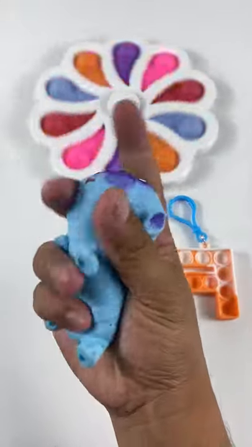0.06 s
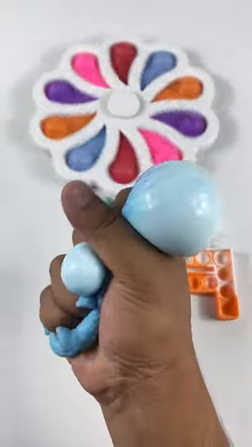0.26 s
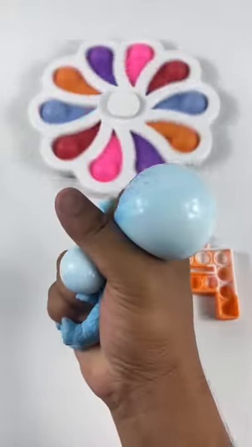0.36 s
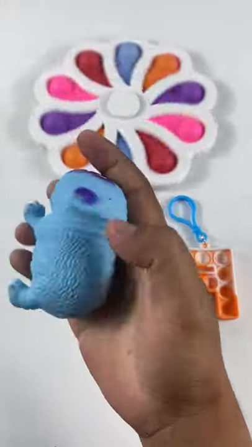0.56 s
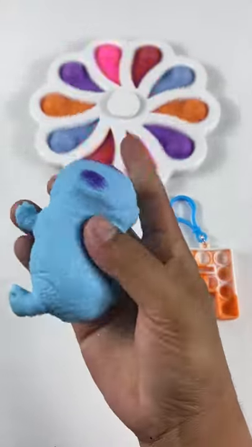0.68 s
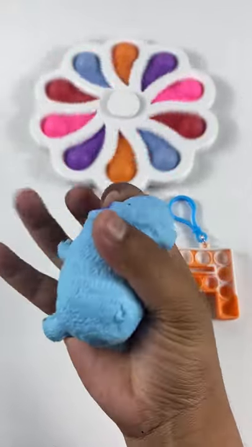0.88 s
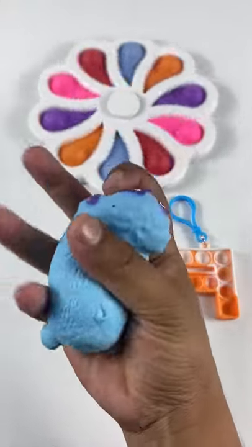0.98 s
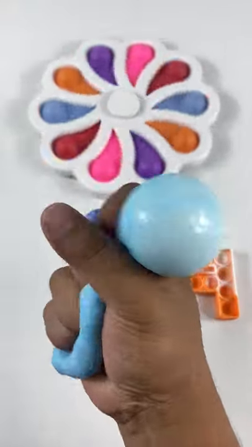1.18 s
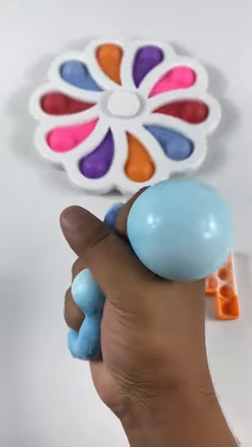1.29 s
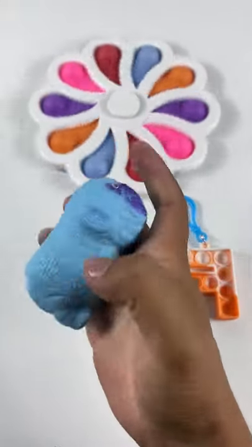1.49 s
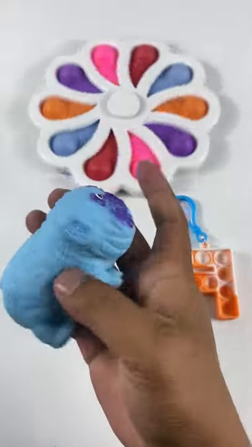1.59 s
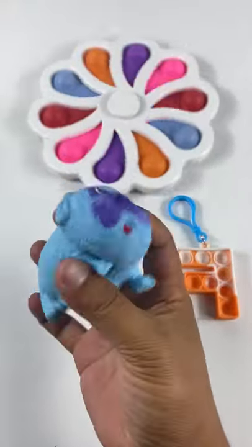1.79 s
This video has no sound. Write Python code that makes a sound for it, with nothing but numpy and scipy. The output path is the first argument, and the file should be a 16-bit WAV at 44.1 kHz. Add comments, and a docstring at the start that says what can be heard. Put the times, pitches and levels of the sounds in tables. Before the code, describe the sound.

A squeezed rubber toy, close up in a small room. Faint sliding and sticky ticks lead to a very loud, hollow, slightly clipped pop at 0.24 s, a skin snap at 0.26, and a short room tail. Soft rubbing and squelches around 0.5. A tiny gurgle at 1.2, then quick bright snaps at 1.26-1.27. A small crisp smack at 1.46 and moist squelching follow, fading into faint noise and hum.

```python
"""Squeezed rubber toy

A hand squeezes a hollow rubber toy twice, heard close up in a small room. In the first squeeze a
balloon-like bulge pops out: a push of air, a ringing cavity and a crack; in both, stretched skin snaps.
Sliding air and rubber hiss, rubbing rubber squelches, air pockets gurgle and sticky rubber clicks;
late in the second squeeze the bulge snaps back. An echo, a diffuse tail, room noise and hum surround it.
"""
import sys
import numpy as np
from scipy import signal
from scipy.fft import rfft, irfft
from scipy.io import wavfile
from scipy.ndimage import uniform_filter1d

SR = 44100
rng = np.random.default_rng(int(sys.argv[2]) if len(sys.argv) > 2 else 0)


def dump(signal):
    """Clip the signal to [-1, 1] and save it as 16-bit WAV at the path in sys.argv[1]."""
    limited = np.clip(np.atleast_2d(signal).T, -1, 1)
    pcm = np.round(limited * 32767).astype(np.int16)
    wavfile.write(sys.argv[1], SR, pcm)


N = 81585  # samples

# The bulge popping out. The row: start in seconds, settled pitch in Hz, level of the ring in dB,
# rise in seconds, decay in seconds, level of the air push in dB.
BULGE_POP = (0.2420, 788, 1, .0006, .0045, -5.5)
POP_START_HZ, POP_GLIDE_S = 600, .0018
PUSH_RISE_S, PUSH_FALL_S = .0006, .0002
POP_CRACK_DB, POP_CRACK_S = -11, .001
# Brief other modes of the cavity. Each row: pitch in Hz, level in dB relative to the main ring, decay in seconds.
CAVITY_MODES = [(330, -22, .003), (485, -17, .004), (1500, -9.5, .0014), (2250, -18, .001)]
# Spectrum of the crack. Each row: frequency in Hz, relative density in dB per Hz.
CRACK_SPECTRUM = [(200, -5), (380, 2), (900, -3), (1200, 0), (1500, 6), (2000, 2), (2800, 0), (3600, -13),
                  (6000, -6), (9000, -21), (16000, -35)]
# The dull blow that the whole bulge sends into the room.
BLOW_HZ, BLOW_CYCLES, BLOW_DB = 700, .5, 4.5

# Snaps of the stretching skin. Each row: time in seconds, pitch in Hz, level in dB before radiation,
# after-ring in dB relative to that level and to SNAP_RING_DB, low cut in Hz.
SKIN_SNAPS = [(0.2601, 1060, -8.5, -14, 200), (1.2616, 1700, -31, 0, 900), (1.2643, 1900, -7.3, 0, 850),
              (1.2714, 2000, -21, 0, 800), (1.2727, 2000, -8, 1, 750), (1.2745, 1300, -23, 0, 700)]
SNAP_CYCLES, SNAP_RING_DB, SNAP_RING_S = .68, -10.5, .002
# How well the skin radiates a flick. Each row: frequency in Hz, gain in dB.
SKIN_RADIATION = [(2000, 0), (2500, 1), (3150, 5), (3600, -5), (4400, 1), (6000, 0)]
# Ring of the skin after a snap. Each row: frequency in Hz, relative density in dB per Hz.
SKIN_RING_SPECTRUM = [(200, -36), (700, -22), (1350, 2), (2100, -1), (3050, 4), (3600, -10), (4200, -2),
                      (5600, -9), (7200, -21), (16000, -42)]

# The bulge snapping back inside. The row: start in seconds, level in dB, decay of its spray in seconds,
# spray in dB relative to that level.
SNAP_BACK = (1.4629, -13, .002, -2.5)
SMACK_RISE_S = .0001
# What the rubber rings with then. Each row: pitch in Hz, level in dB relative to the snap, decay in seconds.
RUBBER_MODES = [(930, -14, .0016), (1560, -13, .0013), (2600, -10.5, .0011), (4550, -5, .0007),
                (6050, -2, .0007), (7000, -11, .0006), (12500, -8, .0005)]
# Spectrum of the unsticking spray. Each row: frequency in Hz, relative density in dB per Hz.
UNSTICKING_SPECTRUM = [(150, -20), (700, -11), (1500, -10), (2750, -9), (3200, -21), (3550, -21),
                       (4050, -6), (5300, -4), (6200, 0), (7300, -1), (8200, -11), (10200, -17),
                       (12400, -11), (16000, -20)]

# Air pockets in the toy. Each row: start in seconds, initial pitch in Hz, level in dB, decay in seconds,
# glide in octaves per second.
AIR_POCKETS = [(0.5555, 410, -34, .009, 4), (0.822, 480, -39, .008, 10), (0.845, 720, -44, .007, 10),
               (1.2035, 420, -34.5, .006, 55), (1.2085, 560, -32, .007, 20), (1.2145, 780, -33, .004, 20),
               (1.2255, 1000, -34.5, .005, 15), (1.481, 465, -41, .02, 0)]
GURGLE_RISE_S = .001

# Sticky rubber letting go. Each row: start in seconds, level in dB before colouring, decay in seconds,
# brightness in dB per octave.
STICKY_CLICKS = [(0.059, -36, .003, -2), (0.1675, -38, .001, -2), (0.2915, -31, .001, -3),
                 (0.498, -25, .0005, 2.2), (0.5585, -30, .0005, 0), (0.7855, -35, .0004, 1.5),
                 (1.0172, -35.5, .0012, -.5), (1.0355, -40, .0006, 2), (1.2457, -40, .0003, 8),
                 (1.631, -40, .0005, 2)]
SCUFF_PER_S, SCUFF_SCATTER_DB, SCUFF_DB, SCUFF_DECAY_S = 110, 2.5, -65.5, .003

# Air and rubber sliding through the fist. Each row: peak in seconds, level in dB, rise in seconds,
# fall in seconds, brightness in dB per octave.
FIST_SLIDES = [(0.065, -54, .03, .04, -2), (0.2, -58, .04, .03, -1), (0.25, -50, .003, .08, -.5),
               (0.415, -53, .02, .012, -1), (0.49, -44, .04, .035, .5), (0.528, -45, .012, .012, -.5),
               (0.561, -46, .008, .04, -.5), (0.76, -55, .07, .07, -.5), (1.04, -61, .06, .07, -.5),
               (1.215, -46.5, .004, .018, 0), (1.228, -49, .008, .02, 2.5), (1.41, -52, .05, .03, .5),
               (1.72, -59, .04, .08, 0), (1.485, -47, .03, .04, 0)]
# Spectrum of rubbing, shared with the clicks. Each row: frequency in Hz, relative density in dB per Hz.
RUBBING_SPECTRUM = [(150, -8), (400, 0), (1300, 2), (1900, -2), (2900, 0), (3800, -4), (5000, -6),
                    (8500, -5), (12000, -9), (16000, -12)]
GRAIN_PER_S, GRAIN_SCATTER_DB, GRAIN_DB = 500, 4, 1

# Stick-slip rubbing. Each row: peak in seconds, centre in Hz, width in Hz of each of two filter passes,
# level in dB, rise in seconds, fall in seconds.
STICK_SLIPS = [(0.062, 1200, 1300, -54, .004, .025), (0.07, 630, 120, -58, .05, .1),
               (0.502, 670, 200, -46, .012, .025), (0.514, 2680, 450, -44, .004, .008),
               (0.527, 2850, 800, -40, .005, .005), (0.560, 500, 700, -43, .005, .02),
               (1.215, 1400, 1400, -40, .004, .008), (0.565, 200, 120, -52, .012, .025),
               (1.428, 800, 700, -51, .015, .012), (1.470, 1700, 1600, -44, .003, .009),
               (1.469, 850, 450, -41.5, .003, .01), (1.483, 500, 600, -39, .004, .008),
               (1.504, 490, 350, -40, .005, .009), (1.504, 2300, 1400, -48, .005, .005),
               (1.555, 455, 80, -53, .03, .05)]
SLIP_PER_S = 700

# A thin, faint tone in the first squeeze. The row: peak in seconds, pitch in Hz, level in dB,
# rise in seconds, fall in seconds.
THIN_TONE = (0.11, 371, -54, .05, .12)

# The single echo off the table and the diffuse tail of the room.
TABLE_ECHO_S, TABLE_ECHO_DB = .0064, -20
ROOM_DB, ROOM_T60_S, ROOM_DELAY_S, ROOM_BUILD_S, ROOM_DAMP_HZ = -15.5, .56, .010, .008, 5000
# Colour of the tail. Each row: frequency in Hz, gain in dB.
ROOM_RESPONSE = [(100, -12), (320, 2), (500, -1), (640, -2), (800, 0), (1020, 1.5), (1600, -6), (2200, -6),
                 (2900, -4), (4000, -7), (8000, -6), (16000, -15)]
# Room resonances left ringing by the pop; the close pair beats. Each row: pitch in Hz, level in dB, t60 in seconds.
ROOM_RESONANCES = [(484, -40, .4), (590, -41, .45), (655, -40, .55), (785, -39, .5), (792, -39, .5),
                   (912, -41, .5), (1010, -47, .55)]

# Spectrum of the room noise. Each row: frequency in Hz, relative density in dB per Hz.
ROOM_NOISE_SPECTRUM = [(50, -6), (90, -4), (234, -11), (360, -9), (650, -12), (1300, -16), (1790, -25),
                       (3080, -28), (4450, -34), (8350, -32), (16000, -44)]
ROOM_NOISE_DB = -55.8
# Spectrum of the rumble. Each row: frequency in Hz, relative density in dB per Hz.
RUMBLE_SPECTRUM = [(12, -12), (25, -2), (48, 0), (65, -8), (100, -17), (200, -35), (500, -70)]
RUMBLE_DB = -44.3  # before the level curve
# Hum partials. Each row: frequency in Hz, mean level in dB before the level curve.
HUM_PARTIALS = [(48.5, -47), (181, -67), (365, -70)]
HUM_WAVER_DB = 2.5
# Level curve of rumble and hum. Each row: time in seconds, gain in dB.
LOW_LEVEL_CURVE = [(0.8, 0), (1.0, -2.5), (1.35, -2.5), (1.5, -5)]

CLIP_LEVEL, TOP_HZ = .7, 16200


def undb(db):
    """Gain is ten to the power of the decibels over twenty."""
    return 10 ** (np.asarray(db) / 20)


def unit(x):
    """Division by the root mean square normalizes a signal to rms 1."""
    return x / np.sqrt(np.mean(x ** 2))


def since(start):
    """Time is counted in seconds from a moment, negative before it."""
    return np.arange(N) / SR - start


def colour(x, points, tilt_db=0, size=4096):
    """A minimum-phase filter follows (Hz, dB) points, tilted per octave about 2 kHz."""
    octave = np.log2(np.maximum(np.arange(size + 1) * SR / (2 * size), 1))
    p = np.array(points, float)
    db = np.interp(octave, np.log2(p[:, 0]), p[:, 1])
    db += tilt_db * np.maximum(octave - np.log2(2000), -2)  # no further tilt below 500 Hz
    # folding the cepstrum onto positive time makes the response causal
    cepstrum = irfft(np.log(undb(db)))
    cepstrum[1:size] *= 2
    cepstrum[size + 1:] = 0
    response = irfft(np.exp(rfft(cepstrum)))[:size]
    return signal.oaconvolve(x, response)[:N]


def noise(points, tilt_db=0):
    """Filtering white noise shapes its spectrum; the result has rms 1."""
    return unit(colour(rng.standard_normal(N), points, tilt_db))


def swell(at, rise, fall):
    """An envelope grows exponentially to its peak and decays exponentially after it."""
    t = since(at)
    return np.exp(np.minimum(t, 0) / rise - np.maximum(t, 0) / fall)


def ring(t, hz, rise, decay):
    """A damped oscillator integrates its possibly moving pitch into phase; t is zero before it starts."""
    phase = 2 * np.pi * np.cumsum(hz * (t > 0)) / SR
    onset = 1 - np.exp(-(t / rise) ** 2)
    return np.sin(phase) * onset * np.exp(-t / decay)


def burst(at, decay):
    """Impulses of random sign start abruptly and die exponentially."""
    return rng.choice([-1., 1.], N) * (since(at) >= 0) * swell(at, decay, decay)


def sparks(rate, scatter_db):
    """Independent random events yield sparse impulses of uneven size, rms 1."""
    happens = rng.random(N) < rate / SR
    size = undb(scatter_db * rng.standard_normal(N))
    return unit(happens * rng.choice([-1., 1.], N) * size)


def flick(at, hz, length):
    """A Gaussian envelope, its length in cycles, confines an oscillation to about one swing."""
    cycles = since(at) * hz
    return np.sin(2 * np.pi * cycles) * np.exp(-(cycles / length) ** 2)


def walk(rate):
    """Smoothing random steps twice gives a slow drift of rms 1."""
    k = int(SR / rate)
    steps = np.repeat(rng.standard_normal(N // k + 1), k)
    return unit(uniform_filter1d(uniform_filter1d(steps, k), k)[:N])


def pop():
    """Sudden displacement pushes air and cracks; the cavity resonates, rising quickly to pitch."""
    at, hz, db, rise, decay, push_db = BULGE_POP
    t = np.maximum(since(at), 0)
    pitch = hz + (POP_START_HZ - hz) * np.exp(-t / POP_GLIDE_S)
    cavity = ring(t, pitch, rise, decay)
    for mode_hz, mode_db, mode_decay in CAVITY_MODES:
        cavity += undb(mode_db) * ring(t, mode_hz, rise, mode_decay)
    push = undb(push_db) * swell(at, PUSH_RISE_S, PUSH_FALL_S)
    crack = undb(POP_CRACK_DB) * colour(burst(at, POP_CRACK_S), CRACK_SPECTRUM)
    return undb(db) * cavity - push + crack


def snaps():
    """Taut skin releases tension in about one cycle, then rings; a small patch radiates little bass."""
    flicks, shake = np.zeros(N), np.zeros(N)
    for at, hz, db, ring_db, cut_hz in SKIN_SNAPS:
        low_cut = signal.butter(3, cut_hz, "high", fs=SR, output="sos")
        flicks += undb(db) * signal.sosfilt(low_cut, flick(at, hz, SNAP_CYCLES))
        shake += undb(db + ring_db) * burst(at, SNAP_RING_S)
    return colour(flicks, SKIN_RADIATION) + undb(SNAP_RING_DB) * colour(shake, SKIN_RING_SPECTRUM)


def smack():
    """Snapping back excites well-damped modes, and unsticking rubber adds a ragged spray."""
    at, db, decay, spray_db = SNAP_BACK
    t = np.maximum(since(at), 0)
    modes = sum(undb(mode_db) * ring(t, hz, SMACK_RISE_S, fall) for hz, mode_db, fall in RUBBER_MODES)
    spray = undb(spray_db) * colour(burst(at, decay), UNSTICKING_SPECTRUM)
    return undb(db) * (modes + spray)


def gurgles():
    """Small air pockets resonate, and those being pinched rise in pitch by at most an octave."""
    out = np.zeros(N)
    for at, hz, db, decay, glide in AIR_POCKETS:
        t = np.maximum(since(at), 0)
        pitch = hz * 2 ** np.minimum(glide * t, 1)
        out += undb(db) * ring(t, pitch, GURGLE_RISE_S, decay)
    return out


def clicks():
    """Adhesion fails in short bursts as tacky rubber tears free; the fingers scuff faintly throughout."""
    tears = sum(undb(db) * colour(burst(at, decay), RUBBING_SPECTRUM, tilt)
                for at, db, decay, tilt in STICKY_CLICKS)
    contacts = np.abs(sparks(SCUFF_PER_S, SCUFF_SCATTER_DB))
    touch = signal.lfilter([1], [1, -np.exp(-1 / (SCUFF_DECAY_S * SR))], contacts)
    return tears + undb(SCUFF_DB) * unit(touch) * noise(RUBBING_SPECTRUM)


def slides():
    """Sliding friction makes hiss and fine sticky grains that swell and fade as the toy slips."""
    out = np.zeros(N)
    for at, db, rise, fall, tilt in FIST_SLIDES:
        rub = rng.standard_normal(N) + undb(GRAIN_DB) * sparks(GRAIN_PER_S, GRAIN_SCATTER_DB)
        out += undb(db) * swell(at, rise, fall) * unit(colour(rub, RUBBING_SPECTRUM, tilt))
    return out


def squelches():
    """Stick-slip friction of rubber on rubber excites a resonance with steep flanks."""
    out = np.zeros(N)
    for at, hz, width, db, rise, fall in STICK_SLIPS:
        b, a = signal.iirpeak(hz, hz / width, fs=SR)
        slips = sparks(SLIP_PER_S, scatter_db=3)
        body = signal.lfilter(b, a, signal.lfilter(b, a, slips))  # two passes steepen the flanks
        out += undb(db) * swell(at, rise, fall) * unit(body)
    return out


def tone():
    """A steady sinusoid under an exponential envelope swells and fades as the first squeeze builds."""
    at, hz, db, rise, fall = THIN_TONE
    return undb(db) * swell(at, rise, fall) * np.sin(2 * np.pi * hz * since(0))


def room(x):
    """Dense reflections form a diffuse tail, a convolution with noise whose treble dies sooner."""
    t = np.maximum(since(ROOM_DELAY_S), 0)
    hiss = rng.standard_normal(N)
    low = signal.sosfilt(signal.butter(2, ROOM_DAMP_HZ, fs=SR, output="sos"), hiss)
    high = signal.sosfilt(signal.butter(2, ROOM_DAMP_HZ, "high", fs=SR, output="sos"), hiss)
    fade = np.exp(-np.log(1000) * t / ROOM_T60_S)
    shape = fade * (1 - np.exp(-t / ROOM_BUILD_S))
    # the second fade halves the treble's decay time
    tail = colour((low - high * fade) * shape, ROOM_RESPONSE) / np.sqrt(np.sum(shape ** 2))
    return undb(ROOM_DB) * signal.fftconvolve(x, tail)[:N]


def room_ring():
    """Standing waves in the room decay freely after the pop."""
    t = np.maximum(since(BULGE_POP[0] + ROOM_DELAY_S), 0)
    return sum(undb(db) * ring(t, hz, ROOM_BUILD_S, t60 / np.log(1000)) for hz, db, t60 in ROOM_RESONANCES)


def background():
    """Steady broadband noise underlies a low rumble and a hum wavering in level and phase."""
    hum = np.zeros(N)
    for hz, db in HUM_PARTIALS:
        level = undb(db + HUM_WAVER_DB * walk(9))
        phase = 2 * np.pi * hz * since(0) + .7 * walk(6)
        hum += level * np.sqrt(2) * np.sin(phase)  # root two turns rms into peak
    low = undb(RUMBLE_DB) * noise(RUMBLE_SPECTRUM) + hum
    low_level = undb(np.interp(since(0), *np.array(LOW_LEVEL_CURVE).T))
    return undb(ROOM_NOISE_DB) * noise(ROOM_NOISE_SPECTRUM) + low * low_level


def scene():
    """Superposition adds the toy, its table echo and the room, which also receives the pop's dull blow."""
    toy = pop() + snaps() + smack() + gurgles() + clicks() + slides() + squelches() + tone()
    echo = undb(TABLE_ECHO_DB) * np.interp(since(TABLE_ECHO_S), since(0), toy, left=0)
    blow = undb(BLOW_DB) * flick(BULGE_POP[0], BLOW_HZ, BLOW_CYCLES)
    return (toy + echo + room(toy + blow) + room_ring() + background())[None]


def record(dry):
    """Hard clipping flattens the loudest peaks, then a steep low-pass removes the top of the treble."""
    clipped = np.clip(dry, -CLIP_LEVEL, CLIP_LEVEL)
    low_pass = signal.ellip(10, .1, 90, TOP_HZ, fs=SR, output="sos")
    return signal.sosfilt(low_pass, clipped)


dry = scene()
out = record(dry)
dump(out)
```